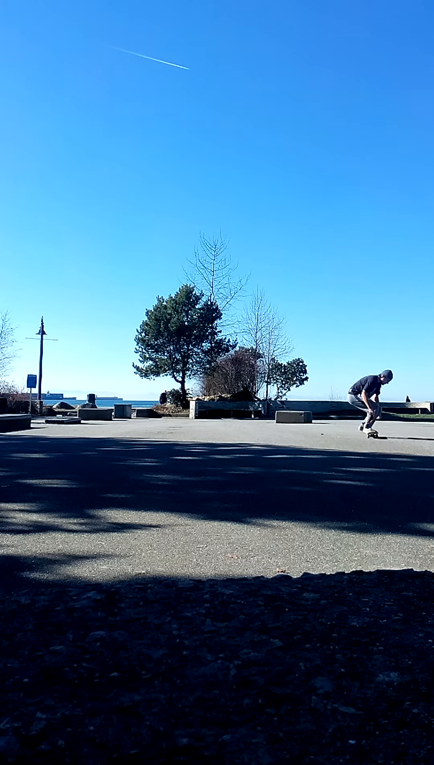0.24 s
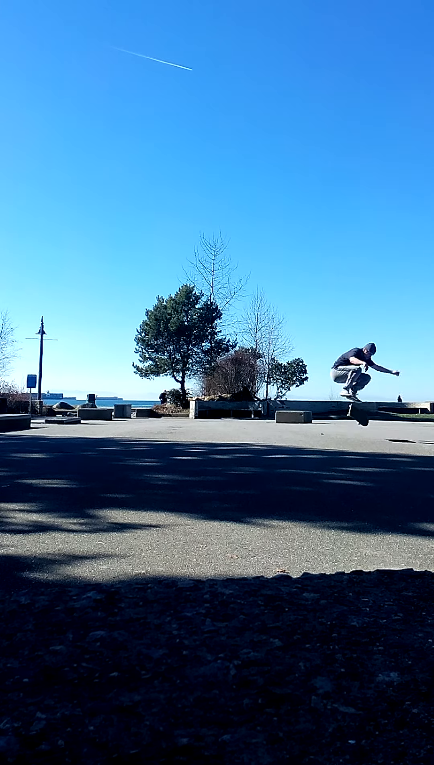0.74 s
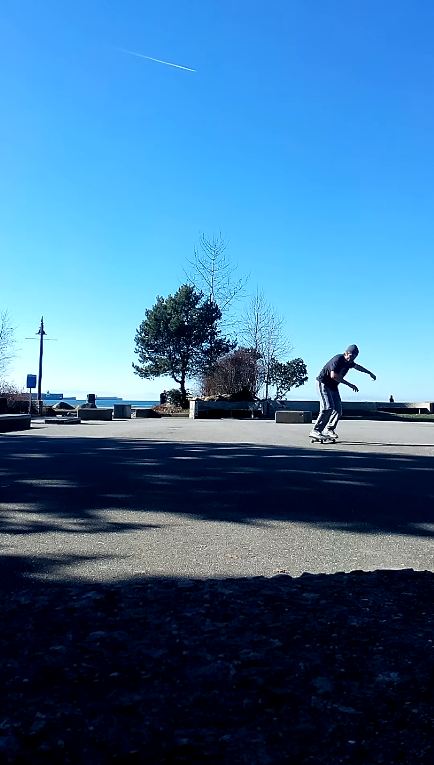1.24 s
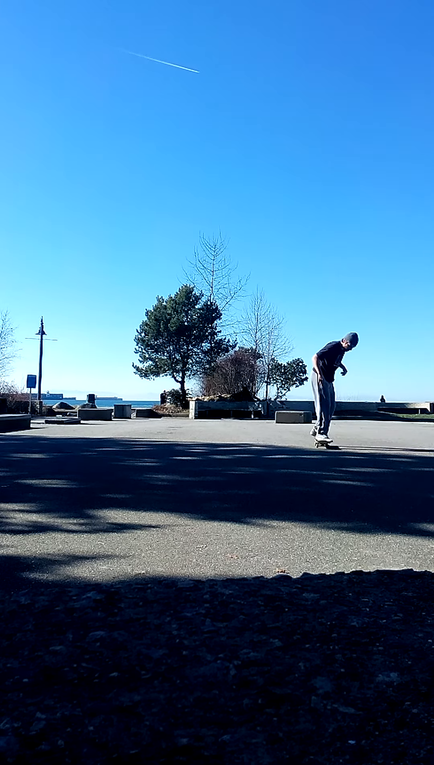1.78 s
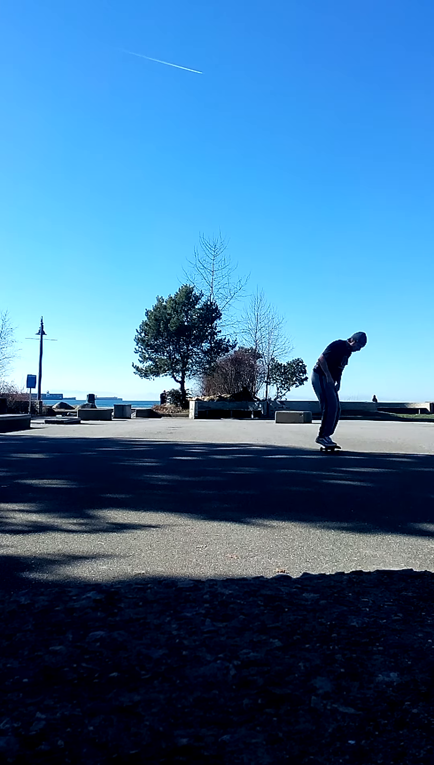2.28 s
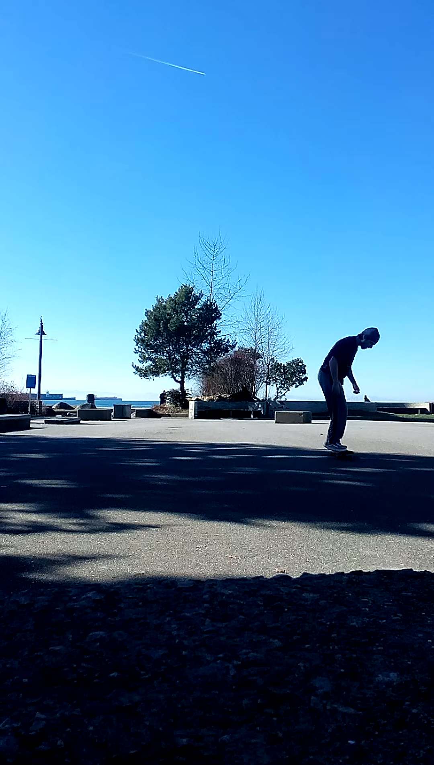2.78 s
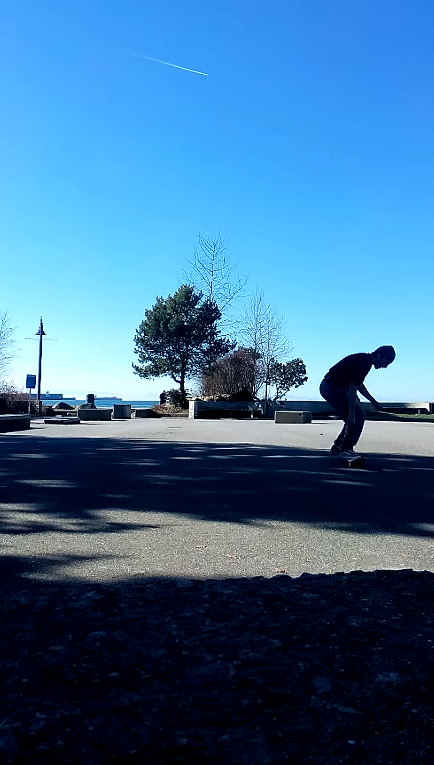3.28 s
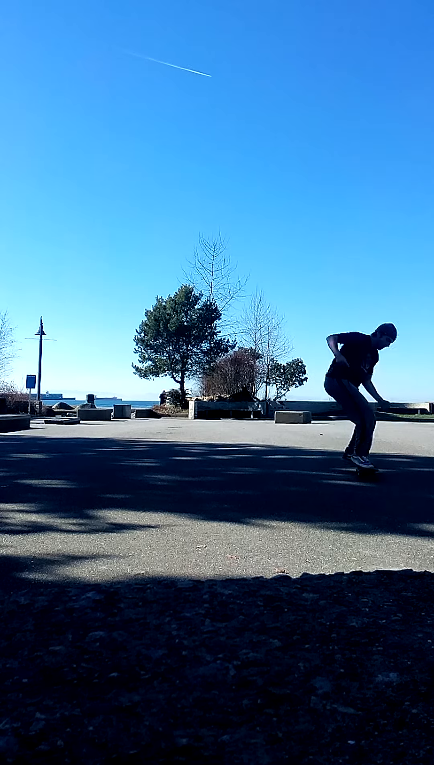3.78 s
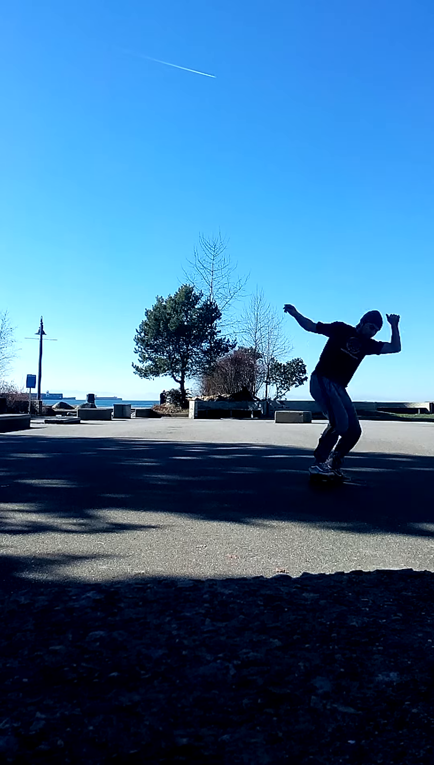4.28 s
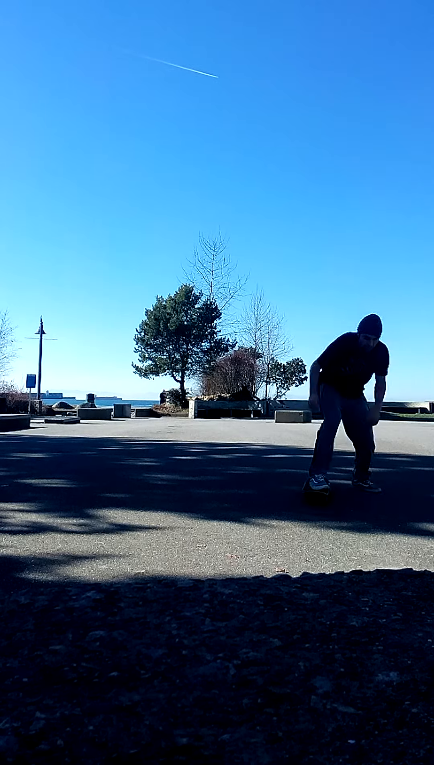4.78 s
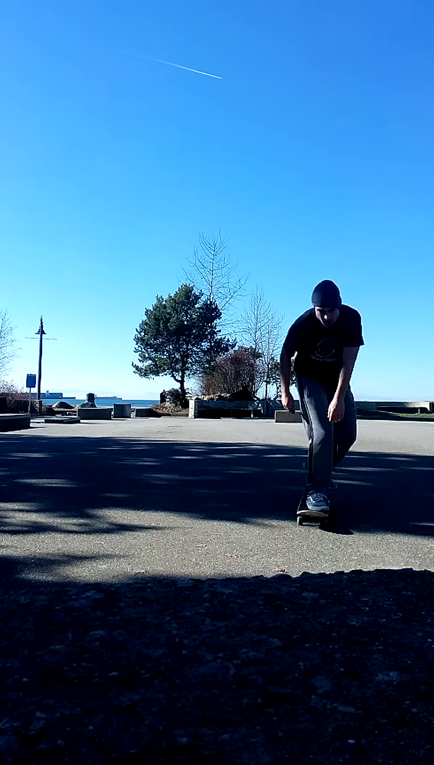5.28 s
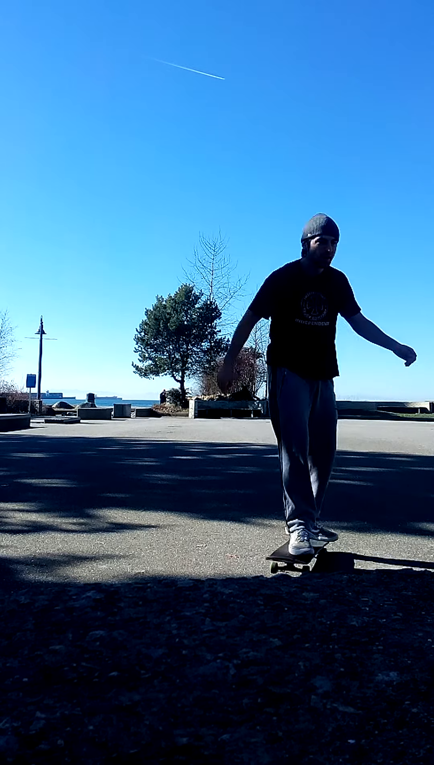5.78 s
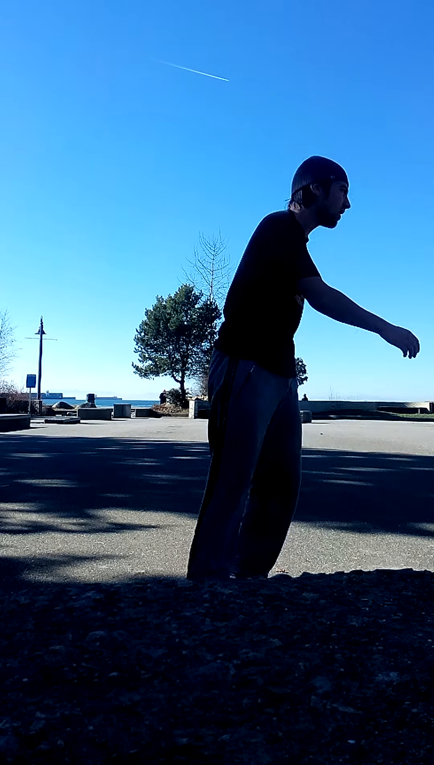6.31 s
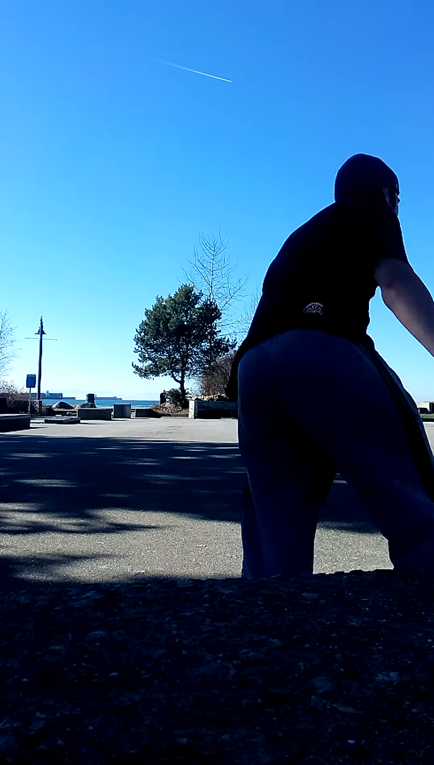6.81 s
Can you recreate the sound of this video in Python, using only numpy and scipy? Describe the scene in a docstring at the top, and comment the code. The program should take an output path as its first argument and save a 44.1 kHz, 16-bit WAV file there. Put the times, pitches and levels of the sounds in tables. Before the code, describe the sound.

Quiet park hum, then a woody skateboard pop and a hard clack of landing, with short echoes from low walls. Wheels scrub and knock quietly before another pop, stronger, and a heavier rattling landing whose peaks overload. Gritty rolling then swells over sand, dips briefly, and surges very near the microphone with deck boom, bearing whizz and truck rattle.

```python
"""Faint town noise and low rolling open the scene; soft knocks lead to the sharp crack of a skateboard's tail.
Two flip tricks follow: the tail strikes the pavement, the wheels fall silent, and deck and wheels slam down in clusters.
Impacts excite the damped modes of the board; rolling is a dense train of tiny impacts, filtered into rasp and rumble.
The board then rolls up close, booming and whizzing; low walls scatter its clacks, and the loudest peaks overload."""
import sys
import numpy as np
from scipy import signal
from scipy.fft import rfft, irfft
from scipy.io import wavfile
from scipy.ndimage import uniform_filter1d

SR = 44100
rng = np.random.default_rng(int(sys.argv[2]) if len(sys.argv) > 2 else 0)


def bounce(signal):
    """Save signal as a 16-bit WAV file at the path given by the first command-line argument."""
    frames = np.transpose(np.atleast_2d(signal))
    limited = np.clip(frames, -1, 1)
    pcm = np.round(limited * 32767).astype(np.int16)
    wavfile.write(sys.argv[1], SR, pcm)


N = 310905
TIME = np.arange(N) / SR  # [s]


def undb(db):
    """Level to amplitude: 20 dB is a factor of ten."""
    return 10 ** (np.asarray(db) / 20)


def unit(x):
    """Normalization: scale to an rms amplitude of 1."""
    return x / np.sqrt(np.mean(x ** 2))


def add(track, s, sound):
    """Superposition: mix a sound into the track at s seconds."""
    i = int(s * SR)
    track[i:i + len(sound)] += sound[:N - i]


def colour(x, points):
    """Minimum-phase filtering: a causal response of the given spectrum, scaled to peak at 1."""
    hz, db = np.transpose(points)
    size = 2048
    bin_hz = np.arange(size // 2 + 1) * SR / size
    gain_db = np.interp(np.log(bin_hz + 1), np.log(hz), db)
    # folding the cepstrum onto positive times makes the response causal
    cepstrum = irfft(np.log(undb(gain_db)))
    cepstrum[1:size // 2] *= 2
    cepstrum[size // 2 + 1:] = 0
    response = irfft(np.exp(rfft(cepstrum)))
    return signal.fftconvolve(x, response / np.abs(response).max())[:len(x)]


def band(x, hz, width):
    """Simple resonator: one peak of the given width [Hz], with gain 1 at its centre."""
    return signal.lfilter(*signal.iirpeak(hz, hz / width, fs=SR), x)


def resonance(x, hz, width):
    """Cascaded resonators: two passes steepen the skirts; rms 1."""
    return unit(band(band(x, hz, width), hz, width))


def shelves(x, bass_db, treble_db):
    """Contact spectrum: heavy contacts carry more bass, hard ones more treble."""
    low = signal.lfilter(*signal.butter(1, 500, fs=SR), x)
    high = signal.lfilter(*signal.butter(1, 2400, "high", fs=SR), x)
    return x + (undb(bass_db) - 1) * low + (undb(treble_db) - 1) * high


def walk(rate):
    """Random modulation: smoothed noise drawn at the given rate [Hz], with rms 1."""
    k = int(SR / rate)
    steps = np.repeat(rng.standard_normal(N // k + 1), k)
    smooth = uniform_filter1d(uniform_filter1d(steps, k), k)
    return unit(smooth[:N])


def fade(t, t60):
    """Exponential damping: a fall of 60 dB in t60 seconds."""
    return np.exp(-np.log(1000) * t / t60)


def envelope(start, attack, hold, release):
    """Attack and decay: fully up at start, held, then falling 60 dB in release seconds."""
    t = TIME - start
    return np.clip(1 + t / attack, 0, 1) * fade(np.maximum(t - hold, 0), release)


def burst(t, t60):
    """Transient noise: a decaying burst of unit energy."""
    x = rng.standard_normal(len(t)) * fade(t, t60)
    return x / np.linalg.norm(x)


def grit(rate, spread_db):
    """Shot noise: random tiny impacts at a mean rate [per s], a few much larger than the rest; rms 1."""
    chance, size = rng.random(N), rng.exponential(size=N)
    sign = rng.choice([-1, 1], N)
    return unit((chance < rate / SR) * sign * undb(spread_db * np.minimum(size, 4)))


# modes of the deck and trucks: (frequency [Hz], level [dB], decay time t60 [s])
BOARD_MODES = [(207.6, -6, 0.38), (296, 1.5, 0.29), (372, 3.5, 0.099), (503, 3.5, 0.18), (740, 4, 0.11),
               (857.5, 5.5, 0.16), (945, 2.5, 0.15), (1105, -1, 0.32), (1320, -5, 0.08), (1686, 2, 0.086),
               (2170, -13, 0.14), (2770, -18.5, 0.09), (3410, -11.5, 0.085)]


def board(t, damping):
    """Modal superposition: damped sines, weighted afresh at each contact; damping divides every t60."""
    hz, db, t60 = np.transpose(BOARD_MODES)[:, :, None]
    weight, detune = rng.standard_normal((2, len(BOARD_MODES), 1))
    sign = rng.choice([-1, 1], (len(BOARD_MODES), 1))
    amplitude = sign * undb(db + 2 * weight)
    sines = np.sin(2 * np.pi * hz * (1 + .004 * detune) * t)
    return np.sum(amplitude * sines * fade(t * damping, t60), axis=0)


def blow(spectrum, rattle_db, rattle_s, ring_db, damping):
    """Impulsive excitation: a sharp crack, a brief rattle of the hardware and the ring of the board."""
    t = TIME[:SR // 4]
    force = undb(rattle_db) * burst(t, rattle_s)
    force[0] += 1
    # bending waves spread the crack over a few cycles without changing its spectrum
    force = force - 2 * band(force, 1700, 1900)
    force = force - 2 * band(force, 3500, 6100)
    return colour(force, spectrum) + undb(ring_db) * board(t, damping)


# tail striking the pavement: (time [s], level [dB], length of the shoe's flick [s], flight of the board [s])
POPS = [(0.8592, -7, 0.065, 0.31), (4.1860, 2, 0.078, 0.31)]
# spectrum of the tail's crack: (frequency [Hz], density [dB per Hz])
POP_SPECTRUM = [(60, -49), (300, -21), (750, -12), (1100, -1), (2000, 3.5), (2600, -4), (3100, -11),
                (3600, -15), (4500, -18.5), (6200, -30), (15000, -51)]


def pops():
    """Impact of a free board: the tail cracks once, brightly, then the trucks chatter on the hollow deck."""
    out = np.zeros(N)
    t = TIME[:SR // 4]
    for s, db, _, _ in POPS:
        crack = blow(POP_SPECTRUM, rattle_db=-8.0, rattle_s=0.037, ring_db=-37.0, damping=1.4)
        chatter = colour(burst(t, 0.14) * np.minimum(t / 0.0065, 1), SLAM_SPECTRUM)
        add(out, s, undb(db) * crack + undb(-8) * shelves(chatter, 1.5, 0))
    return out


# wheels, deck and shoes coming down: (time [s], level [dB], bass shelf [dB], treble shelf [dB])
SLAMS = [(1.2262, -19.5, -3, 15), (1.230, 5.5, -9, -9), (1.2336, 1, -6.5, -7), (1.271, -16, -0.5, -16),
         (1.285, -23.5, -15, 10), (4.5157, -3, 0.5, 3), (4.533, -2, 11, -12), (4.5363, -7.5, 0.5, 6.5),
         (4.540, -1, 7.5, 4), (4.6022, -14, 10, 18), (4.6053, -7.5, 9.5, 6), (4.752, -18.5, 5.5, 7)]
# spectrum of wheels and deck striking: (frequency [Hz], density [dB per Hz])
SLAM_SPECTRUM = [(50, -17), (150, -5.5), (350, 0.5), (650, -1.5), (950, -0.5), (1650, -4.5), (2200, -9),
                 (2800, -15), (4000, -23), (5600, -27), (8500, -34), (15000, -60.5)]


def landings():
    """Clustered impacts: wheels and feet hit in quick succession; light bounces are mostly rattle."""
    out = np.zeros(N)
    for s, db, bass_db, treble_db in SLAMS:
        slam = blow(SLAM_SPECTRUM, rattle_db=3.0 - 0.21 * db, rattle_s=0.022, ring_db=-31, damping=1)
        add(out, s, undb(db) * shelves(slam, bass_db, treble_db))
    return out


# wheels knocking on joints and stones, trucks clicking: (time [s], level [dB], bass shelf [dB])
KNOCKS = [(.743, -38.5, -9), (1.164, -32.5, -4), (1.354, -31, -4), (1.364, -27, -13), (1.42, -37.5, 14.5),
          (1.591, -34, -12), (1.777, -34.5, -21), (1.815, -40.5, -23), (2.036, -36.5, 2),
          (2.212, -36.5, 7.5), (2.613, -44, -10), (3.118, -49.5, 0), (3.484, -39, -16), (4.468, -21, 1.5),
          (4.638, -20, 1), (4.912, -25, -14), (4.94, -29, 1), (5.002, -28.5, -9), (5.362, -41.5, 1),
          (6.137, -27, 0.5), (6.154, -31, -11), (6.409, -32, 16), (6.460, -32.5, 15)]


def knocks():
    """Cushioned impact: soft wheels leave mostly dull rattle, and the rider's weight damps the board."""
    out = np.zeros(N)
    for s, db, bass_db in KNOCKS:
        knock = blow(SLAM_SPECTRUM, rattle_db=9.5, rattle_s=0.088, ring_db=-21.5, damping=1.9)
        add(out, s, undb(db) * shelves(knock, bass_db, treble_db=3))
    return out


def flicks():
    """Friction noise: after each pop the front shoe scrapes up the fine grip tape and slips off the edge."""
    gain = np.zeros(N)
    for s, db, length, _ in POPS:
        stroke = np.interp(TIME - s, [0, .003, length, length + 0.019], [0.011, 0.64, 0.42, 0.026])
        gain += undb(db) * stroke
    scrape = band(band(rng.standard_normal(N), 3300, 6500), 4300, 9000) * undb(1.4 * walk(150))
    return undb(-44.0) * gain * unit(scrape)


# the ride up close, in two stretches on either side of the knock at 6.14 s: (time [s], rumble gain [dB], rasp
# gain [dB])
APPROACH = [
    [(5.27, -60, -67), (5.422, -47, -59.5), (5.788, -31, -41), (5.938, -35.5, -35.5), (6.11, -52, -50.5)],
    [(6.19, -41, -51.5), (6.572, -29, -35.5), (6.622, -32.5, -34.5), (6.822, -18.5, -26.5),
     (7.04, -23, -28.5)],
]
# the board judders after each landing and settles: (time [s], rasp gain [dB], decay [dB per s])
JUDDERS = [(1.241, -31.5, 44), (4.519, -32, 61)]
# wheels scrubbing as the rider leans, pivots or crouches; a negative swell sinks instead:
# (start [s], length [s], rasp gain at the end [dB], swell up to the end [dB], rumble relative to rasp [dB])
SCRUBS = [(0.088, 0.12, -48.5, 8, -4), (0.64, 0.13, -50.5, 3.5, -0.5), (1.17, 0.021, -44.5, -5.5, -6),
          (1.598, 0.06, -42, -1.5, -5.5), (1.908, 0.2, -32.5, 24, -10.5), (2.141, 0.068, -35, 10, -15),
          (2.241, 0.18, -47, 15, 3.5), (2.573, 0.022, -58.5, -5, -17), (3.426, 0.088, -50, 10, -18),
          (3.912, 0.16, -45, 7, 1.5), (4.812, 0.36, -42, -3, -7), (5.757, 0.2, -46, 23, -10)]


def wheel_levels():
    """Energy summation: gains of rasp, rumble and scrub from rolling (silent in flight), judders and scrubs."""
    nose_lift = 0.11  # the wheels unload this long before each pop [s]
    far_rumble_db, far_rasp_db = -60.5, -74  # plain rolling out on the plaza
    judder_rumble_db = -7  # relative to the rasp
    s, rumble_db, rasp_db = np.vstack(APPROACH).T
    grounded = np.ones(N)
    for pop, _, _, flight in POPS:
        grounded -= envelope(pop - nose_lift, attack=.03, hold=nose_lift + flight, release=.04)
    rasps = [grounded * undb(np.interp(TIME, s, rasp_db, left=far_rasp_db))]
    rumbles = [grounded * undb(np.interp(TIME, s, rumble_db, left=far_rumble_db))]
    for start, db, decay in JUDDERS:
        settling = undb(db - decay * np.maximum(TIME - start, 0))
        gain = envelope(start, attack=0.056, hold=0.44, release=0.33) * settling
        rasps.append(gain)
        rumbles.append(gain * undb(judder_rumble_db))
    scrubs = []
    for start, length, db, swell_db, low_db in SCRUBS:
        to_come = np.clip(1 - (TIME - start) / length, 0, 1)
        gain = envelope(start, attack=0.01, hold=length, release=0.14) * undb(db - swell_db * to_come)
        scrubs.append(gain)
        rumbles.append(gain * undb(low_db))
    return [np.linalg.norm(gains, axis=0) for gains in (rasps + scrubs, rumbles, scrubs)]


ARRIVAL_S = 6.57  # the board comes close
# spectrum of wheels on grit: (frequency [Hz], density [dB per Hz])
RASP_SPECTRUM = [(200, -13), (450, -9.5), (590, -11.5), (690, 2.5), (880, -1.5), (1100, -2.5), (1400, -4),
                 (2100, -7.5), (3000, -20), (4300, -28), (5600, -26), (6700, -49.5), (8200, -22.5),
                 (11000, -34), (15000, -65.5)]


def rasp(rasp_gain, bumps):
    """Filtered shot noise: grit under the wheels rasps, and single pebbles ring the board."""
    # grit lies in patches
    stones = grit(rate=2000, spread_db=1.5) * bumps * undb(2.0 * walk(45))
    # pebbles give the board short, dull kicks
    ring = signal.fftconvolve(grit(rate=200, spread_db=4.5), board(TIME[:SR // 8], damping=6.8))[:N]
    return rasp_gain * unit(unit(colour(stones, RASP_SPECTRUM)) + undb(-2.0) * resonance(ring, 1600, 1900))


# spectrum of the low rolling noise: (frequency [Hz], density [dB per Hz])
RUMBLE_SPECTRUM = [(40, -23.5), (80, 2), (130, 4), (200, -0.5), (320, -2.5), (520, -1.5), (740, -8),
                   (1100, -28.5), (3000, -44.5)]


def rumble(rumble_gain, bumps):
    """Forced vibration: bumps rumble, and close up the boom of the deck takes over."""
    rise = 0.36  # [s]
    boom = undb(np.interp(TIME - ARRIVAL_S, [-rise / 2, rise / 2], [-16, 11.5]))  # relative to the rumble [dB]
    load = grit(rate=2800, spread_db=1.5) * bumps
    low_mode = band(band(load, 205, 50), 235, 160)
    high_mode = band(band(load, 305, 80), 330, 200)
    deck = unit(low_mode + undb(-1) * high_mode)
    bumping = unit(colour(grit(rate=2500, spread_db=1.5), RUMBLE_SPECTRUM))
    # dividing by the summed energy leaves the level to rumble_gain
    return rumble_gain * (bumping + boom * deck) / np.sqrt(1 + boom ** 2)


# patches of loose sand: (start of the thickest part [s], its length [s], hiss [dB])
SAND_PATCHES = [(4.874, 0.15, -55), (5.913, 0.038, -50.5), (6.84, 0.23, -49)]


def sand(rasp_gain):
    """Granular noise: sand crackles in step with the rasp, and more clearly in the patches."""
    hiss = np.zeros(N)
    for s, length, db in SAND_PATCHES:
        rise = 71 * np.maximum(s - TIME, 0)  # 71 dB per s
        fall = 174.5 * np.maximum(TIME - s - length, 0)
        hiss += undb(db - rise - fall)
    crackle = resonance(grit(rate=8600, spread_db=6), 4500, 4200)
    return np.hypot(hiss, undb(-23) * rasp_gain) * crackle


def bearings():
    """Resonant shot noise: the bearings whizz as the board comes close."""
    attack = 0.0096  # [s]
    gain = undb(-49.5) * envelope(ARRIVAL_S + attack, attack, hold=0.29, release=0.33)
    return gain * unit(band(band(grit(rate=6300, spread_db=8.0), 8300, 1400), 8200, 2400))


def rolling(rasp_gain, rumble_gain):
    """Roughness excitation: uneven pavement shakes the wheels, modulating rasp and deck alike."""
    bumps = undb(1.9 * walk(90))
    return rasp(rasp_gain, bumps) + rumble(rumble_gain, bumps) + sand(rasp_gain) + bearings()


# jolts over rough spots close by: (time [s], level [dB])
JOLTS = [(6.729, -25), (6.780, -17.5), (6.822, -17), (6.885, -17), (6.914, -18), (6.993, -23.5)]


def jolts():
    """Shock excitation: each jolt rattles the trucks and sets the lowest deck modes booming."""
    out = np.zeros(N)
    t = TIME[:SR // 4]
    for s, db in JOLTS:
        rattle = blow(SLAM_SPECTRUM, rattle_db=11, rattle_s=0.075, ring_db=-19, damping=2.1)
        boom = resonance(board(t, damping=2.4), 290, 220)
        add(out, s, undb(db) * (rattle + undb(-13) * boom))
    return out


def scuffs(scrub_gain):
    """Stick-slip friction: sliding wheels catch and slip in uneven grains, brighter than rolling."""
    slips = grit(rate=1700, spread_db=4.5) * undb(5.5 * walk(70))
    return undb(-14) * scrub_gain * resonance(slips, 2350, 1100)


# hoarse hums of a loaded wheel: (start [s], length [s], pitch [Hz], level [dB])
HUMS = [(0.649, 0.092, 464, -52), (1.164, 0.079, 550, -50), (1.231, 0.15, 572, -34),
        (1.415, 0.13, 546, -43.5), (1.59, 0.065, 960, -42), (3.935, 0.13, 457, -44.5),
        (4.473, 0.046, 500, -34), (4.84, 0.36, 625, -46), (6.138, 0.02, 430, -35.5),
        (6.394, 0.13, 125, -33.5), (6.526, .42, 826, -43)]


def hums():
    """Driven resonance: the pavement excites one narrow, wavering resonance of the wheel."""
    out = np.zeros(N)
    for start, length, hz, db in HUMS:
        ring = resonance(rng.standard_normal(N), hz, 87)
        # reading along a drifting clock bends the pitch by about 1.5 %
        ring = np.interp(TIME + np.cumsum(.015 * walk(10)) / SR, TIME, ring)
        out += undb(db) * envelope(start, attack=.008, hold=length, release=0.069) * ring
    return out


# a wheel slipping sideways: (time [s], pitch [Hz], level [dB])
CHIRPS = [(1.611, 2300, -54), (1.655, 2130, -44), (4.517, 2710, -15.5), (6.574, 2040, -28),
          (6.597, 2760, -35.5)]


def chirps():
    """Stick-slip squeal: a wheel catches and lets go in a brief, rough squeak."""
    out = np.zeros(N)
    t = TIME[:SR // 4]
    for s, hz, db in CHIRPS:
        squeak = resonance(rng.standard_normal(len(t)), hz, 720) * fade(t, 0.087)
        add(out, s, undb(db) * squeak)
    return out


# grains cracking under the wheels: (time [s], level [dB])
SAND_CRACKS = [(5.8793, -45), (5.908, -37)]


def sand_cracks():
    """Brittle fracture: a crushed grain bursts in a short, bright crunch."""
    out = np.zeros(N)
    t = TIME[:SR // 8]
    for s, db in SAND_CRACKS:
        crunch = resonance(rng.standard_normal(len(t)), 3100, 4700) * fade(t, .05)
        add(out, s, undb(db) * crunch)
    return out


def plaza(x, wet_db, t60, top_hz):
    """Diffuse scattering: pavement, kerbs and low walls return a short, duller tail."""
    t = TIME[:SR // 2]
    echoes = burst(t, t60) * np.minimum(t / 0.0027, 1)
    tail = signal.lfilter(*signal.butter(2, top_hz, fs=SR), echoes)
    return x + undb(wet_db) * signal.fftconvolve(x, tail)[:N]


def air(rasp_gain):
    """Saturating modulation: a thin top hiss swells with the wheels up to a ceiling."""
    hiss = unit(band(band(rng.standard_normal(N), 14000, 3500), 12900, 4600))
    return undb(-64) * hiss * np.tanh(rasp_gain / undb(-52.5))


# spectrum of the steady background: (frequency [Hz], density [dB per Hz])
PARK_SPECTRUM = [(25, -9.5), (110, 2.5), (200, -9), (500, -18), (1200, -16), (2000, -22), (3000, -28.5),
                 (6700, -29), (13500, -20.5), (16000, -39)]


def park():
    """Ambient noise: distant low town noise wavers under a faint, even hiss."""
    noise = unit(colour(rng.standard_normal(N), PARK_SPECTRUM))
    hum = unit(band(band(rng.standard_normal(N), 85, 80), 88.0, 110)) * undb(2 * walk(1.6))
    return undb(-58.0) * noise + undb(-55.5) * hum


def scene():
    """Linear superposition: the board on the plaza, over the quiet park."""
    rasp_gain, rumble_gain, scrub_gain = wheel_levels()
    cracks = plaza(pops(), wet_db=-13.5, t60=0.34, top_hz=2190)
    slams = plaza(landings() + knocks() + chirps(), wet_db=-12.5, t60=0.46, top_hz=9000)
    wheels = rolling(rasp_gain, rumble_gain) + scuffs(scrub_gain) + hums() + jolts() + sand_cracks()
    return (cracks + slams + flicks() + wheels + park() + air(rasp_gain))[None]


def record(dry):
    """Overload and band limiting: the loudest peaks clip, and a steep low-pass cuts the top."""
    clipped = np.clip(dry, -1, 1)
    low_pass = signal.ellip(8, .2, 70, 15800, fs=SR, output="sos")  # cutoff 15.8 kHz
    return signal.sosfilt(low_pass, clipped)


dry = scene()
out = record(dry)
bounce(out)
```